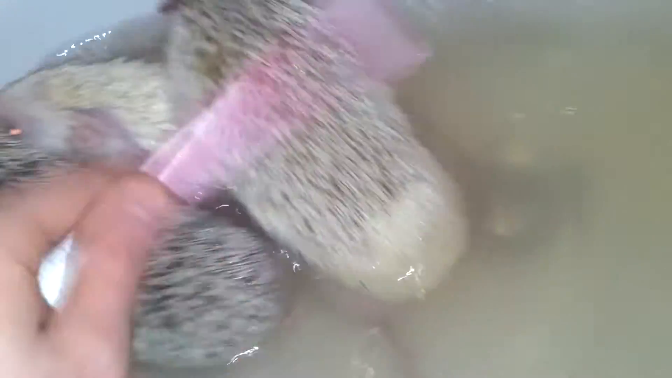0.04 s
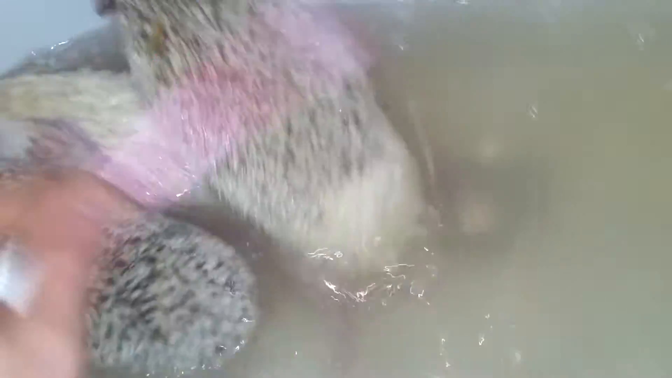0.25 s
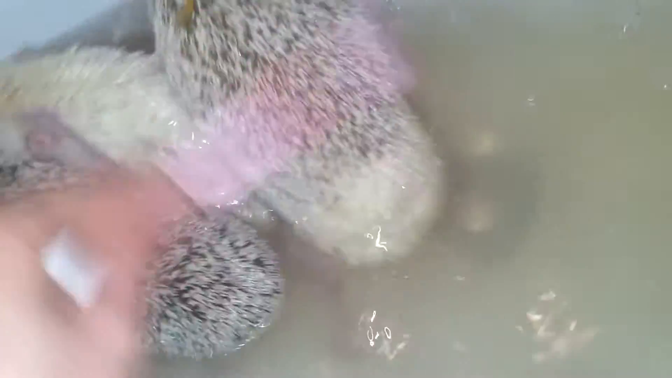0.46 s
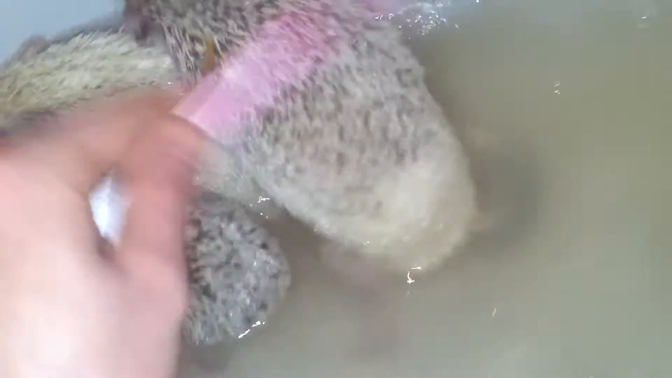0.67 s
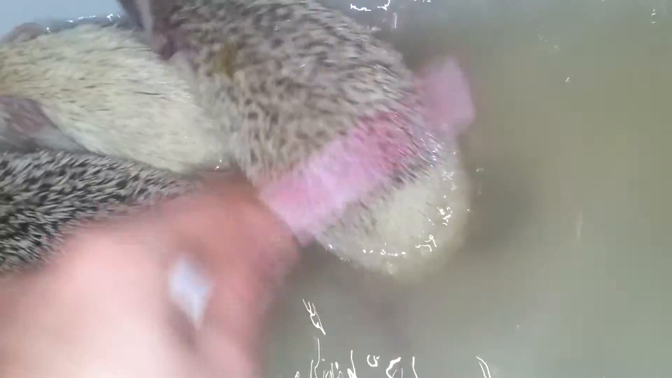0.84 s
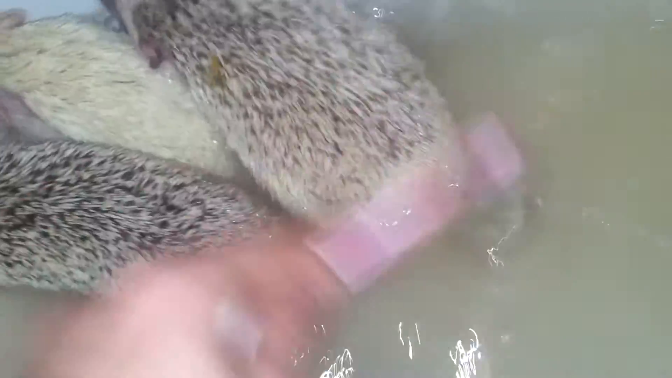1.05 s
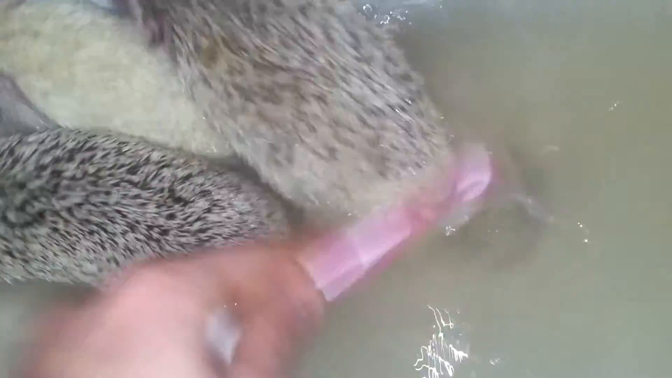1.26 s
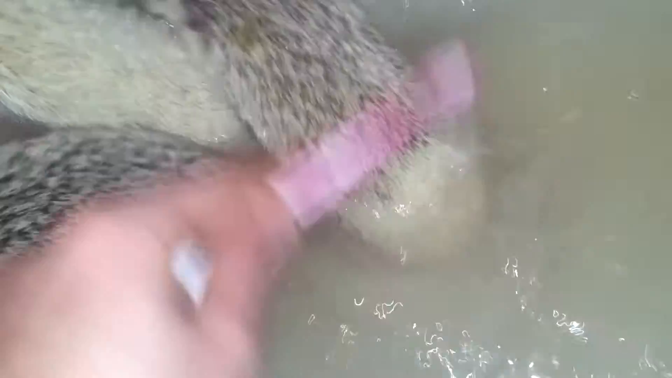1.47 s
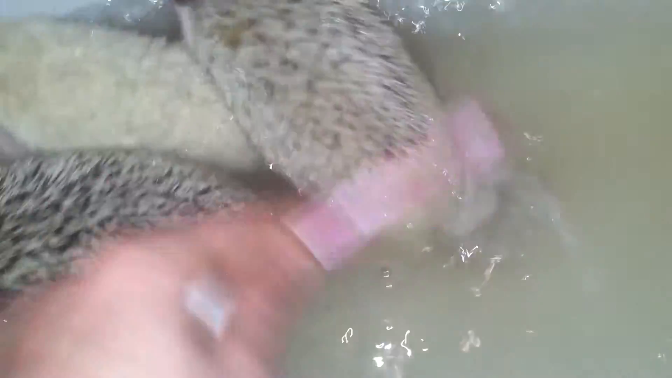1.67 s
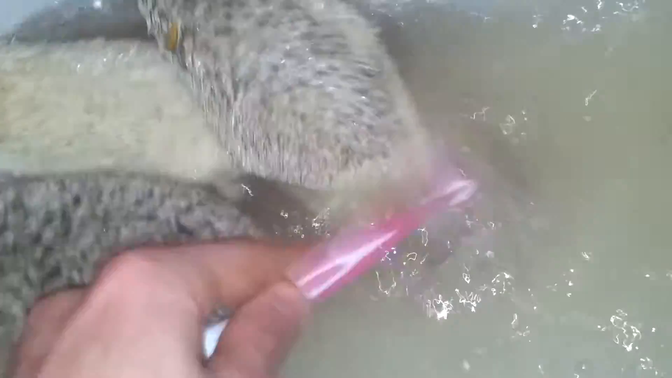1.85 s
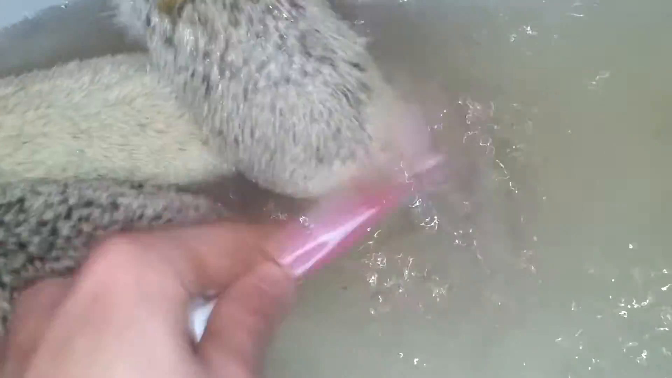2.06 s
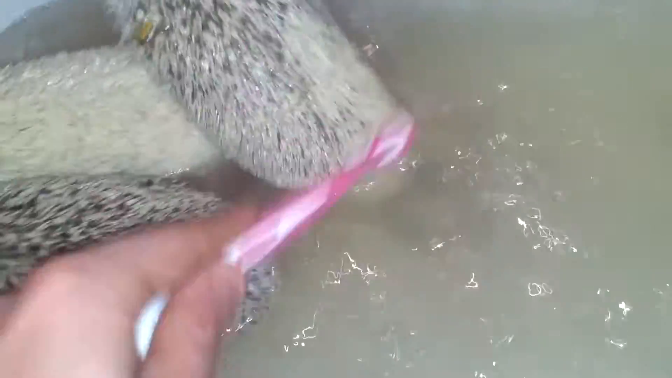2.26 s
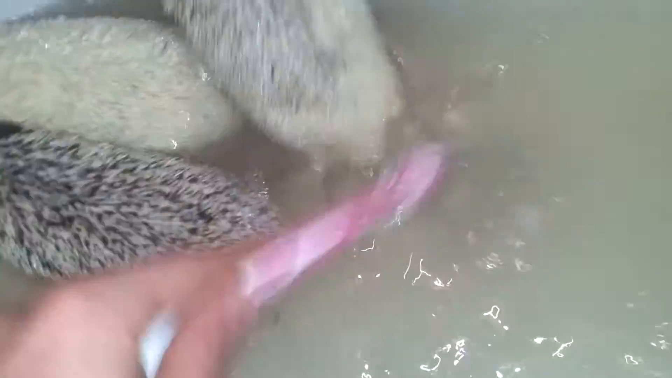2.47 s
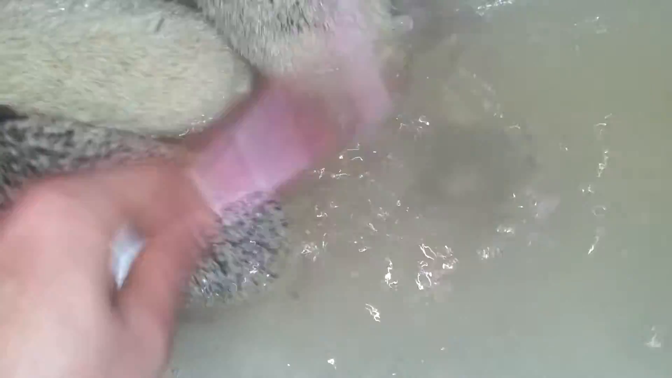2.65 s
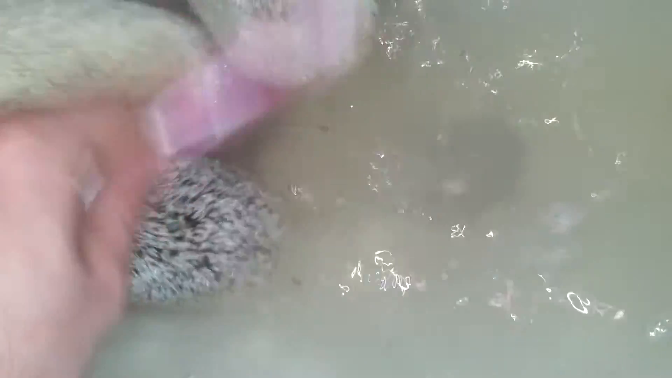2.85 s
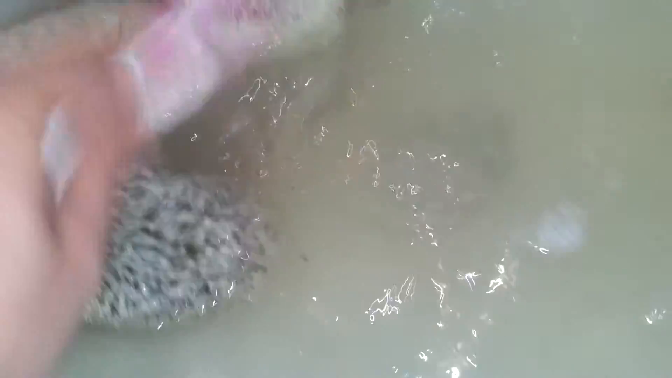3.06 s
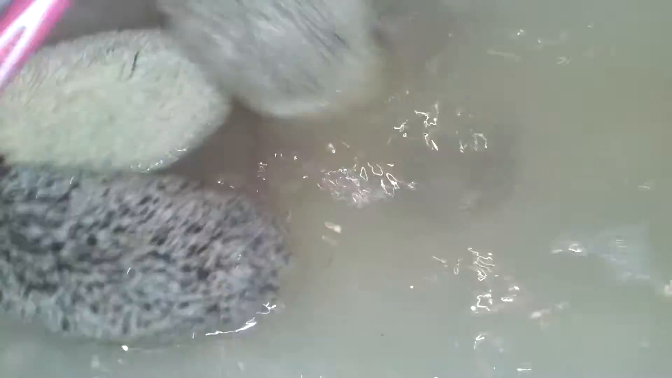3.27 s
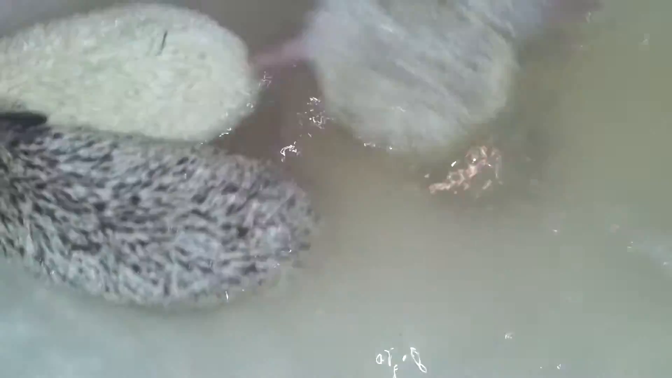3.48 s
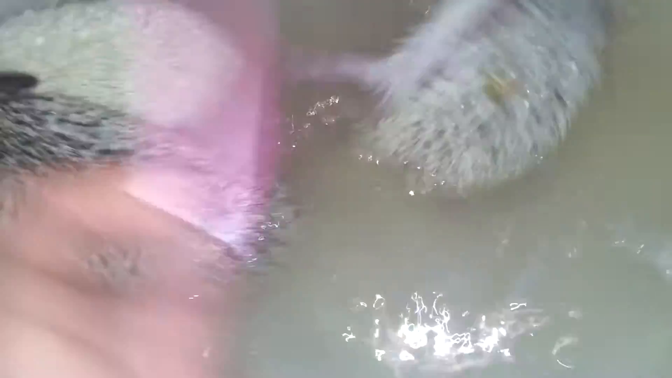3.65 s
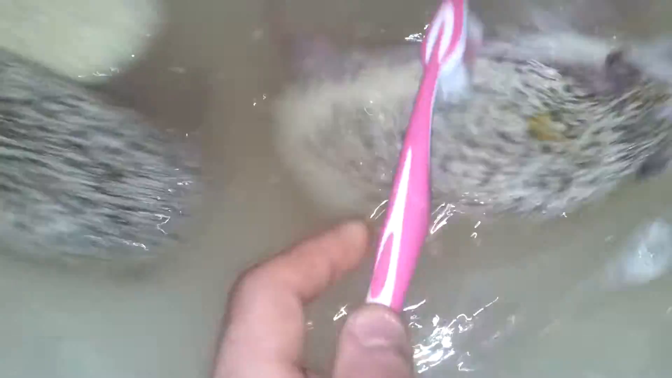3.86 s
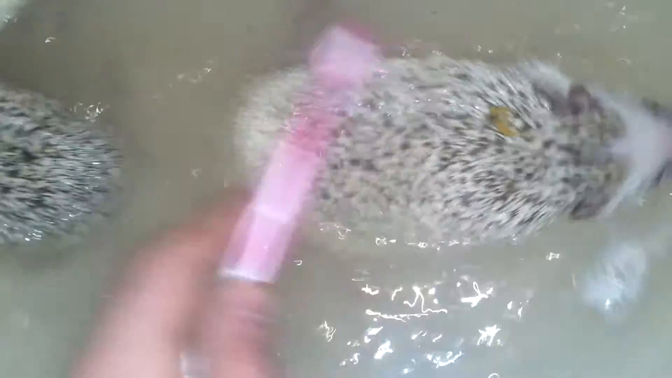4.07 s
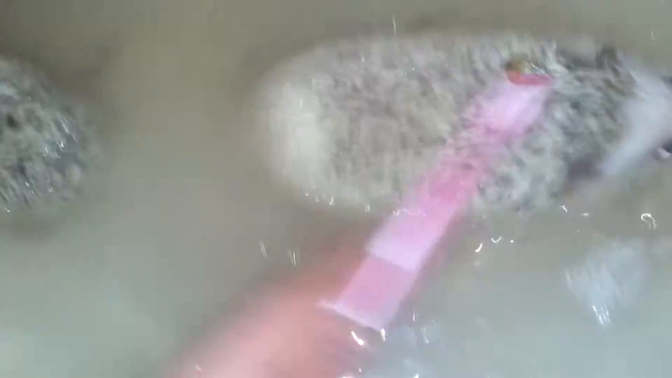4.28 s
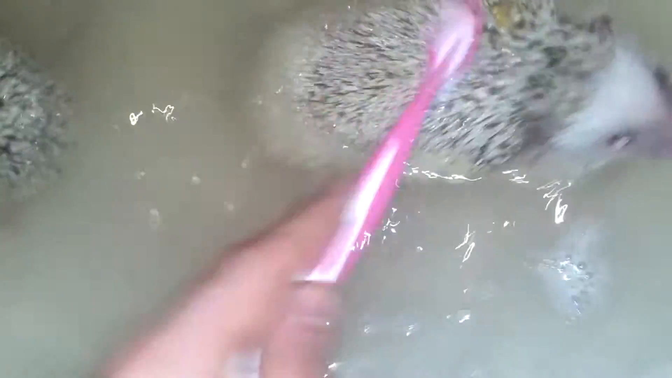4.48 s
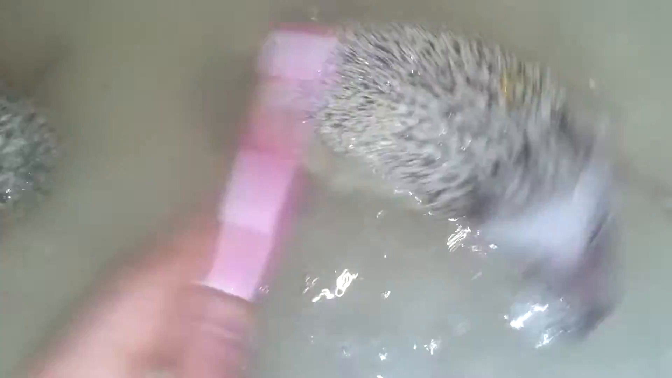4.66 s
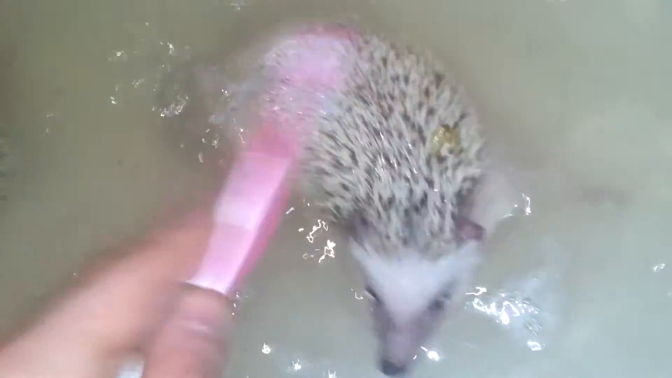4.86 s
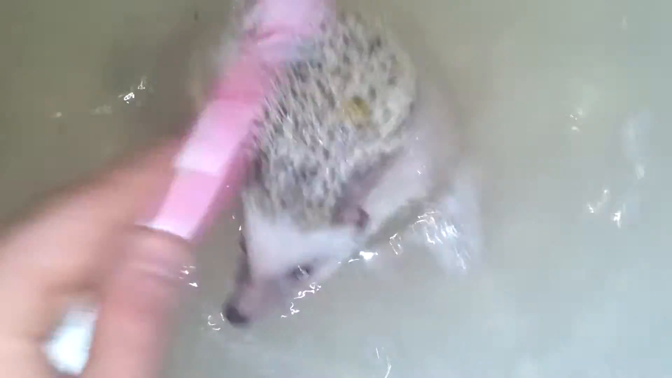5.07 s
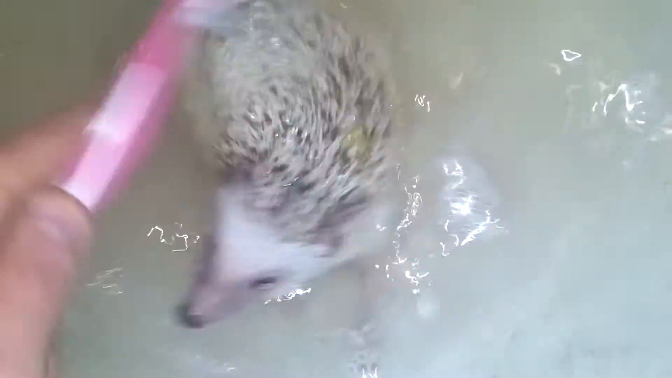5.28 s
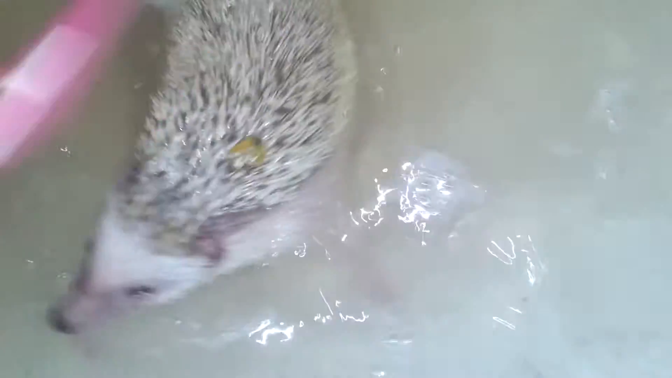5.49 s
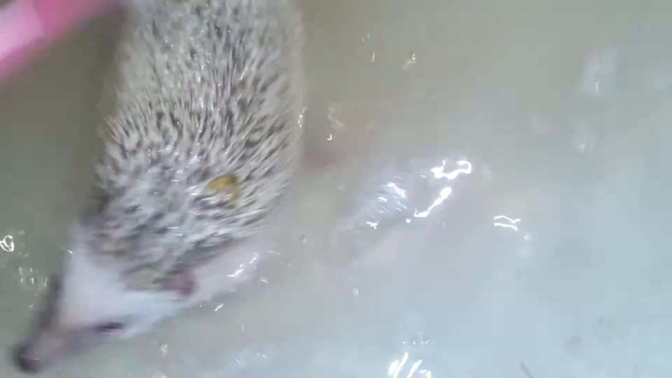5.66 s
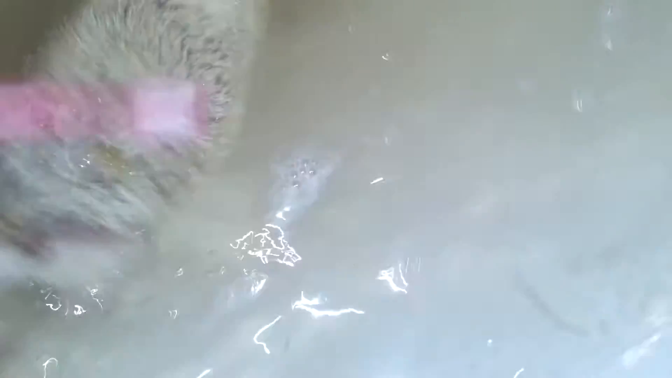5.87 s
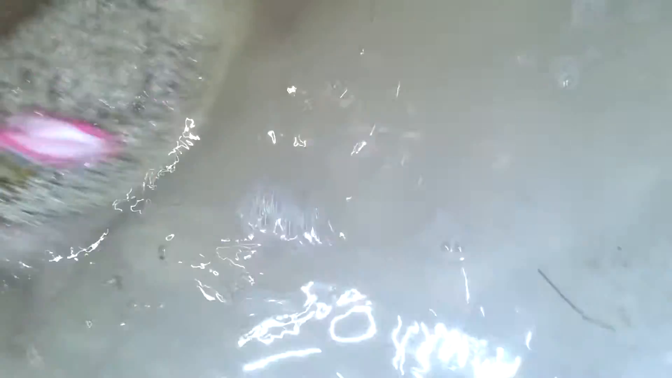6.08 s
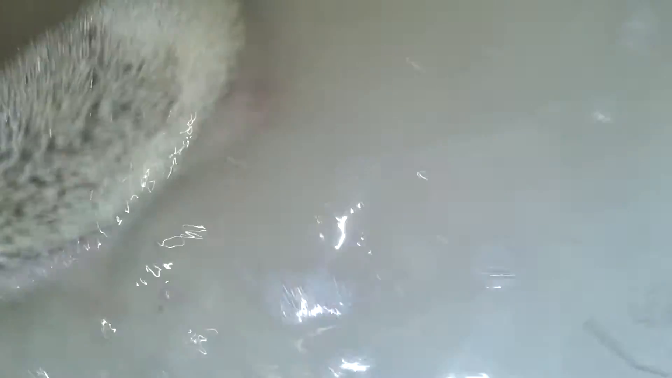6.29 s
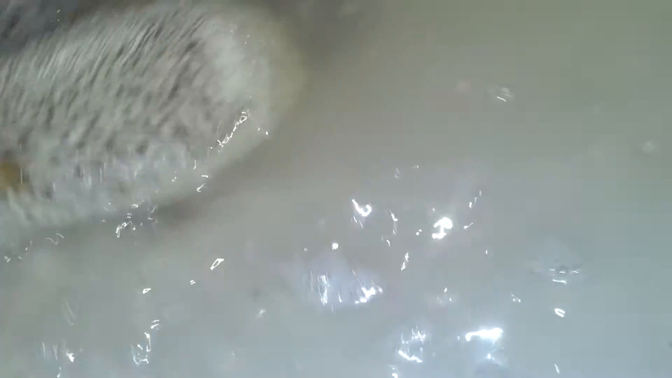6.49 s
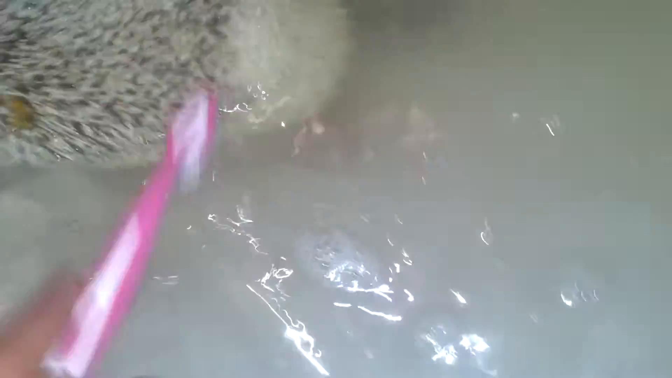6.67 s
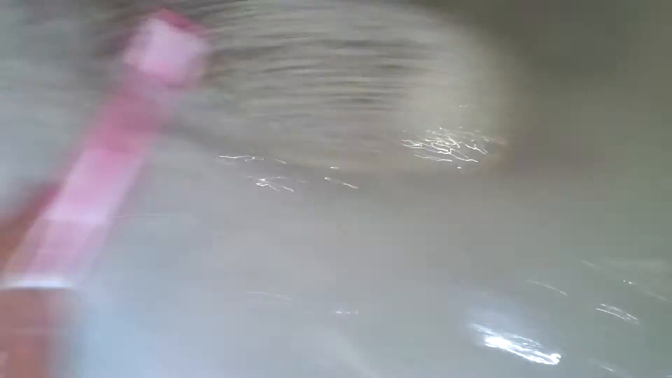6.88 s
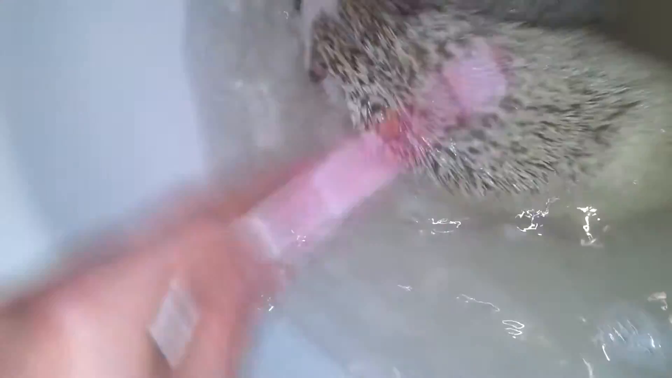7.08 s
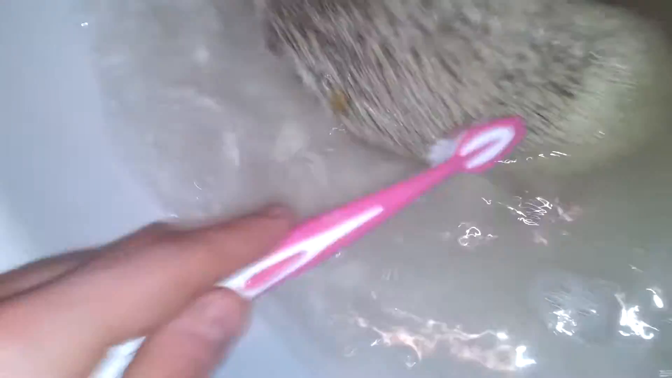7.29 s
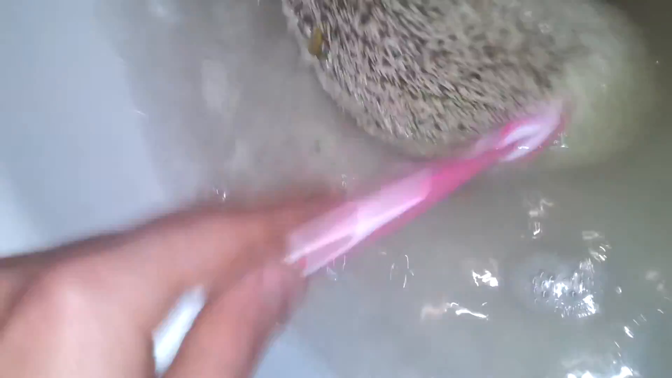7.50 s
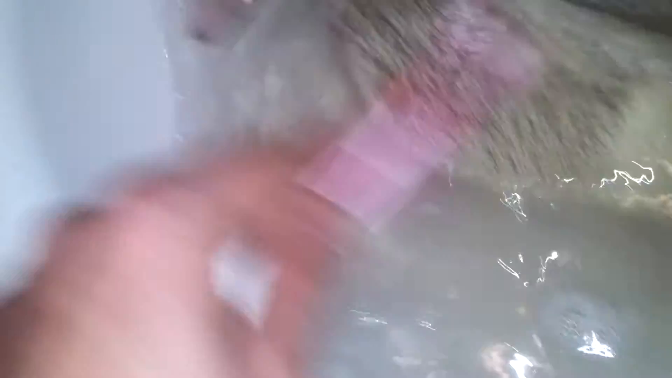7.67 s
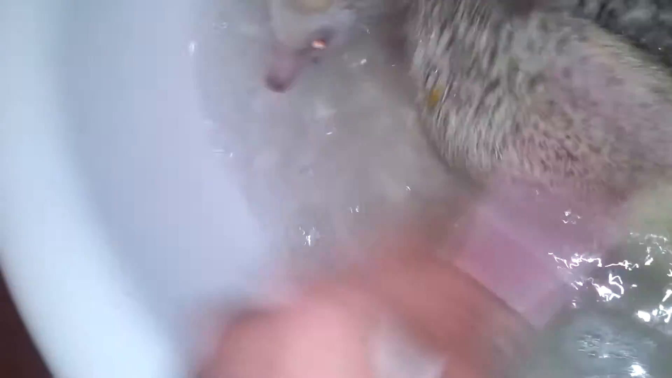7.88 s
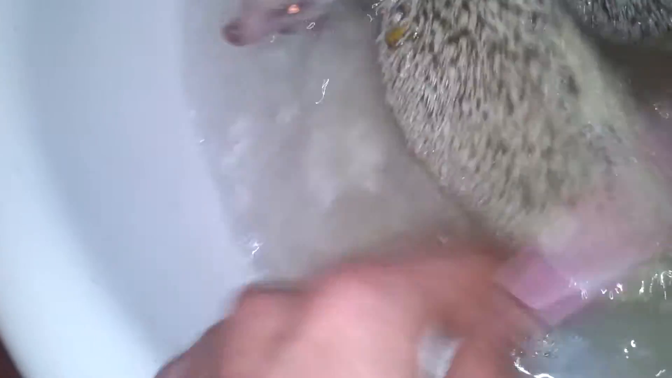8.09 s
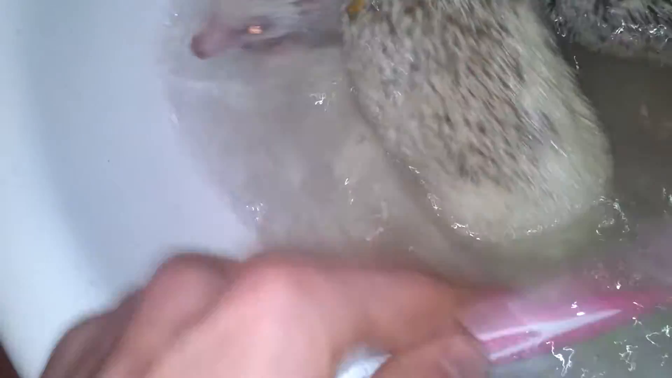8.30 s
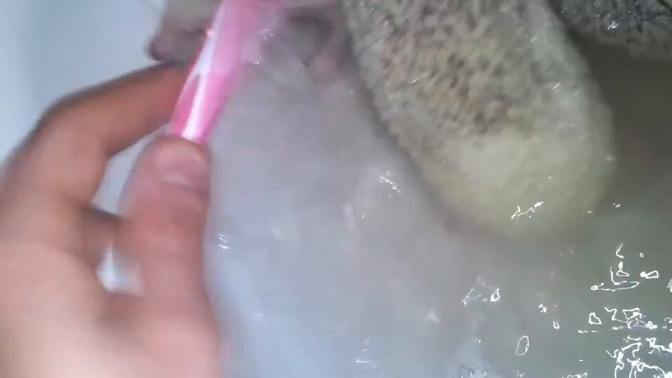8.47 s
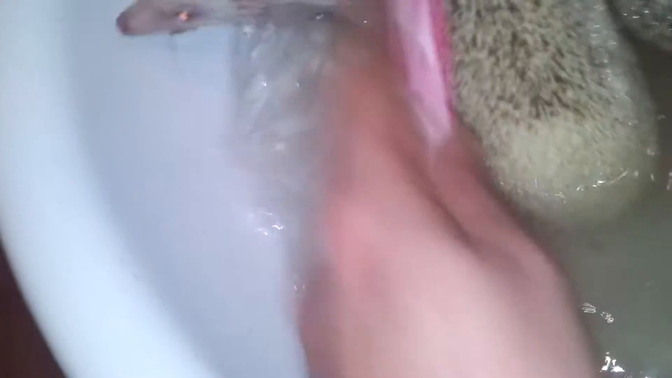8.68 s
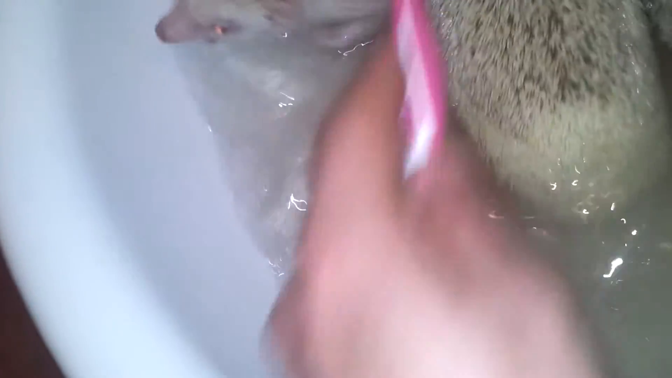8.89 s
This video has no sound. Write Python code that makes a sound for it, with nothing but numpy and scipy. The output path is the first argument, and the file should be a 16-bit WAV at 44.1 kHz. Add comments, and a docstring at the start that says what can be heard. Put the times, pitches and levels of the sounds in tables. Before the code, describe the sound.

Toothbrush bristles scrub a small spiny animal in a tub of water, brisk fizzing strokes with pauses, drips, plops and light swishes.

```python
"""Scrubbing a hedgehog in a tub

A toothbrush scrubs the wet spines of a small hedgehog in a plastic tub of shallow water, about five strokes
a second at its busiest. Each stroke is a dense fizz of tiny clicks that lands, swells and lifts off.
The animal paddles: filtered noise and ringing bubbles make the swishes, drips, plops and a low glug.
Bright noise bursts make the snaps and one soft touch of the brush, and random reflections make a small
hard room. The left port is shaded.
"""
import sys
import numpy as np
from scipy import signal
from scipy.fft import rfft, irfft
from scipy.io import wavfile

SR = 44100
rng = np.random.default_rng(int(sys.argv[2]) if len(sys.argv) > 2 else 0)


def store_wav(level_fs):
    """Save 16-bit WAV to argv[1]."""
    pcm = np.round(np.clip(np.atleast_2d(level_fs), -1, 1) * 32767)
    wavfile.write(sys.argv[1], SR, pcm.T.astype(np.int16))


N = 394254
TIME = np.arange(N) / SR  # seconds
BINS = np.fft.rfftfreq(N, 1 / SR)  # Hz

# Steady background at each port: frequency_hz, left_db_per_hz, right_db_per_hz
BACKGROUND_SPECTRA = [(20, -98, -104), (44.3, -86.5, -91), (84, -78.5, -103.5), (119, -78, -89.5),
                      (239, -84, -86.5), (460, -89, -88), (1020, -94.5, -94), (2240, -99, -100),
                      (4500, -101, -100), (6200, -107, -101), (7200, -105, -96.5), (9200, -104, -101),
                      (15000, -103, -102)]
# How long the room rings (t60 = time to fall by 60 dB): frequency_hz, t60_s
ROOM_RING = [(200, 0.4), (1000, 0.32), (4000, 0.29), (8000, 0.26), (15000, 0.28)]
# How well the walls reflect: frequency_hz, gain_db
WALL_REFLECTION = [(300, 1), (1500, 3.5), (4000, 1), (7500, 0), (10000, -0.5), (14500, -2.5)]
# What the shaded left port loses: frequency_hz, gain_db
LEFT_SHADE = [(200, -4.5), (450, -4), (750, -14.5), (1300, -14.5), (2200, -17.5), (4000, -22.5),
              (6000, -29), (8000, -30.5), (12000, -17.5), (15000, -23)]
# What the straight path round to the left port loses as well: frequency_hz, gain_db
PATH_AROUND = [(500, -2.5), (1200, -4.5), (3000, -7), (8000, -12)]
# Colour of swishing water: frequency_hz, relative_db
SWISH_COLOUR = [(120, -22.5), (300, 0), (550, 0), (1000, 0.5), (2000, 5.5), (3500, 4.5), (7500, 6),
                (10000, 3), (15000, -5.5)]
# How restless the water is in the tub: time_s, level_db
WATER_UNREST = [(0, -53), (.85, -52), (1.15, -60.5), (1.75, -52), (2.2, -58.5), (3.2, -57.5), (3.35, -86),
                (3.75, -58), (5.5, -67), (6.4, -54), (7.6, -65), (8.94, -67)]
# Water sloshes; the row at 0 s is the end of a brush stroke already lifting off:
# crest_s, level_db, half_length_s
WATER_SWELLS = [(0, -44, 0.026), (0.987, -42, 0.041), (1.424, -43, 0.11), (3.897, -54.5, 0.077),
                (6.446, -45, 0.063), (6.6, -53.5, 0.11), (7.003, -46, 0.15), (8.445, -52.5, 0.11),
                (8.578, -50, 0.073)]
# A drip traps a bubble that rings: start_s, level_db, pitch_hz
DRIP_EVENTS = [(.117, -28, 3350), (.940, -34.5, 2920), (1.3226, -21.5, 1860), (1.389, -30, 2480),
               (1.430, -30.5, 496), (1.480, -30.5, 342), (1.482, -27.5, 930), (1.542, -24, 4400),
               (1.692, -28.5, 1375), (2.222, -30.5, 2020), (3.585, -36, 1450), (3.879, -34.5, 1900),
               (3.912, -40, 1690), (3.974, -30, 2300), (4.811, -32.5, 2400), (4.963, -34, 1860),
               (6.649, -27, 4230), (7.2932, -23, 3170), (7.355, -31.5, 3800), (7.367, -27.5, 1750),
               (8.287, -29.5, 2270)]
# A heavy drop plops: start_s, level_db, pitch_hz, tilt_db_per_octave (away from the pitch, either way)
PLOP_EVENTS = [(0.0552, -14.5, 2420, -17), (6.2734, -13, 761, 2), (6.720, -19, 1132, -11)]
# What a plop rings with: multiple_of_pitch, level_db, t60_s
PLOP_PARTIALS = [(.58, -16.5, 0.024), (1, -10.5, 0.076), (1.05, -2.5, 0.027), (1.3, -11.5, 0.028),
                 (1.7, -3.5, 0.016), (2.95, -8, 0.0058)]
# A spine or water film snaps; at 6.161 s the brush touches softly:
# start_s, peak_db, pitch_hz, width_octaves
SNAP_AND_TOUCH_EVENTS = [(0.054, -13.5, 8300, 0.095), (0.122, -33, 4480, 0.19), (1.323, -26, 7500, 0.52),
                         (2.0820, -12, 7700, .3), (2.540, -25.5, 7400, 0.075), (2.800, -32, 7200, .27),
                         (2.938, -19.5, 4720, 0.13), (3.1183, -9, 13600, 0.16), (3.912, -27, 7300, .33),
                         (3.949, -32, 7500, .36), (4.46, -34.5, 9000, 0.69), (4.838, -26, 7000, 0.87),
                         (4.909, -33, 13000, 0.47), (5.43, -16, 8350, 0.22), (5.944, -22.5, 8500, 0.54),
                         (6.161, -26, 7700, 1), (6.2732, -6.5, 8630, 0.43), (6.429, -23, 7300, 0.11),
                         (6.581, -31, 8140, .37), (6.647, -31, 4260, 0.31), (7.043, -25, 7000, 1),
                         (7.2917, -20.5, 3560, 0.4), (8.559, -28.5, 5750, 0.44), (8.716, -18, 7560, .44)]
# Colour of bristles on spines: frequency_hz, relative_db
BRISTLE_COLOUR = [(300, -33.5), (900, -24.5), (1250, -12.5), (2200, -12), (3300, -6), (5000, -3),
                  (6200, -2.5), (7800, 1.5), (10000, -4.5), (12500, -6.5), (15000, -11.5)]
# Brush strokes: start_s, touch_to_fastest_s, relative_level_db, landing_db (relative to that level),
# pressure_db (rasp over fizz)
BRUSH_STROKES = [(0.148, 0.023, -30, -3, -4), (0.326, 0.077, -27.7, -21, -1.5),
                 (.550, 0.069, -28, -9.5, -2), (0.778, 0.044, -28, -2, -1), (0.978, 0.056, -30, 0, 0),
                 (1.199, 0.049, -26.5, -5.5, -2), (1.411, .047, -28, -28, -2), (1.630, 0.026, -28.5, 3, 1),
                 (1.816, .056, -26, -25, -0.5), (2.017, 0.07, -24.5, -10, -1),
                 (2.242, 0.036, -27, -3.5, -5.5), (2.440, 0.047, -26.5, -2.5, -4.5),
                 (2.641, 0.041, -33.5, -8, -4.5), (2.844, 0.049, -26, -5, -3),
                 (3.051, 0.059, -29, -3.5, -3), (4.025, 0.069, -44, -0.5, -1.5),
                 (4.304, 0.069, -34.5, 0, -3), (4.533, 0.048, -32.5, -2.5, -1.5),
                 (4.749, 0.054, -31, -17, -3.5), (4.959, 0.091, -37, 2, -1.5), (5.164, .076, -31.5, -3, -1),
                 (5.387, 0.039, -35.5, 2.5, 1.5), (5.567, 0.064, -35.5, -2, -1.5),
                 (5.872, 0.051, -32, -16, -1.5), (6.182, 0.03, -37, 0, 2), (6.900, 0.038, -44.5, -3, -1),
                 (7.000, 0.046, -42, -2, 2), (7.222, 0.065, -37, -8, -1), (7.472, 0.032, -34, 1, 1),
                 (7.688, 0.043, -36, -4.5, 0.5), (7.875, .053, -32.4, -25, 1), (8.077, 0.037, -34, -25, 1),
                 (8.282, 0.038, -32, -1, -1), (8.712, 0.072, -35, 1.5, -4)]

EDGE_HZ = 14720  # upper limit of the recorder
SHADE_LAG_S = 0.00024
RING_S, RING_AT_HZ, RING_SLOPE = 0.02, 2000, 0.31  # t60 of a bubble at that pitch; smaller ones die sooner
GLUG_S, GLUG_LENGTH_S, GLUG_HZ, GLUG_DB = 3.668, 0.084, 258, -50.5
FLICKS_PER_S, RASP_HZ = 22000, 5000  # rasp lies mostly below this pitch, fizz above
ECHO_S, ECHO_SHARE = 0.0016, 0.27  # the water surface and tub wall return each stroke a moment later
STROKE_S = 0.14  # all strokes take about this long: the later the fastest point, the quicker the lift-off
SWELL_SHARE, FADE_SHARE = 0.58, 0.23  # widths as shares of the time before and after the fastest point


def gain_of(db):
    """Turns decibels into a multiplier."""
    return 10 ** (np.asarray(db) / 20)


def evened(x):
    """Scales a sound to an average (rms) level of 1."""
    return x / np.sqrt(np.mean(x ** 2) + 1e-20)


def read(points, hz):
    """Reads a table between its points, along a logarithmic pitch scale."""
    f, value = np.transpose(points)
    return np.interp(np.log(hz + 1), np.log(f + 1), value)


def add(mix, s, sound):
    """Adds a sound to the mix at a time in seconds."""
    part = mix[max(round(s * SR), 0):][:len(sound)]
    part += sound[:len(part)]


def coloured(x, points):
    """Makes each pitch louder or softer as a table says."""
    return irfft(rfft(x) * gain_of(read(points, BINS)), N)


def wander(max_hz):
    """Slow random movement: noise kept below max_hz, at rms 1."""
    return evened(irfft(rfft(rng.standard_normal(N)) * (BINS < max_hz), N))


def grains(per_s, spread_db):
    """Tiny clicks at random moments, of random sign and size, at rms 1."""
    size = rng.standard_normal(N) * gain_of(spread_db * np.minimum(rng.exponential(1, N), 4))
    return evened(size * (rng.random(N) < per_s / SR))


def crackle(pitch, octaves, rise_s):
    """A noise burst around one pitch that rises and dies in milliseconds; peak 1."""
    t = np.arange(SR // 8) / SR
    hz = np.fft.rfftfreq(len(t), 1 / SR)
    octaves_away = np.log2((hz + 1) / pitch)
    band = np.exp(-0.5 * (octaves_away / octaves) ** 2)
    noise = irfft(rfft(rng.standard_normal(len(t))) * band, len(t))
    burst = noise * t * np.exp(-t / rise_s)
    return burst / abs(burst).max()


def bubble(hz, t60, rise_per_s=1.0, onset_s=0.00071, splash_db=-9.5, splash_octaves=0.66, splash_s=0.002):
    """The surface breaks with a tiny splash; the bubble rings and goes sharp as it rises."""
    t = np.arange(SR // 8) / SR
    tone = np.sin(2 * np.pi * hz * t * (1 + rise_per_s * t))  # pitch climbs by twice rise_per_s
    ring = tone * (1 - np.exp(-t / onset_s)) * np.exp(-np.log(1000) * t / t60)
    return ring + gain_of(splash_db) * crackle(hz, splash_octaves, splash_s)


def background(port):
    """Room rumble and faint hiss: steady noise coloured for one port (0 left, 1 right)."""
    spectrum = np.array(BACKGROUND_SPECTRA)[:, [0, port + 1]]
    return np.sqrt(SR / 2) * coloured(rng.standard_normal(N), spectrum)


def tail(first_s=0.003):
    """Dense reflections of random sign, each band dying at its own speed."""
    count = SR // 2
    taps = rng.choice([-1.0, 1.0], count)
    taps = taps * (rng.random(count) < 3000 / SR)  # about 3000 reflections a second
    taps = taps * (TIME[:count] > first_s)
    hz, t, bands = signal.stft(taps, SR, nperseg=256)
    decay = np.exp(-np.log(1000) * t / read(ROOM_RING, hz)[:, None])
    ring = signal.istft(bands * decay, SR, nperseg=256)[1]
    return ring / np.linalg.norm(ring)


def room(x, drift_per_s=0.599, count=3):
    """The pattern of reflections drifts, as hand and animal move, by fading between several tails."""
    out = np.zeros(N)
    for k in range(count):
        share = np.cos(np.pi * (drift_per_s * TIME + k / count)) * np.sqrt(2 / count)
        out += signal.oaconvolve(x * share, tail())[:N]
    return out


def stirring():
    """Loudness of the moving water: each swell in the table comes and goes over the general unrest."""
    power = gain_of(np.interp(TIME, *np.transpose(WATER_UNREST))) ** 2
    for crest_s, db, half_s in WATER_SWELLS:
        power = power + gain_of(db) ** 2 * np.exp(-2 * ((TIME - crest_s) / half_s) ** 2)
    return np.sqrt(power)


def water(swish_db=-0.5, bubbles_db=-11, bubbles_per_s=500, lap_db=3.0):
    """Stirred water swishes as coloured grains and sheds a froth of small ringing bubbles."""
    swish = evened(coloured(grains(per_s=6000, spread_db=1.0), SWISH_COLOUR))
    swish = swish * gain_of(lap_db * wander(max_hz=20))
    t = np.arange(SR // 20) / SR
    froth = np.zeros(N)
    pitches = np.geomspace(500, 6000, num=24)
    for hz in pitches:
        ring = np.sin(2 * np.pi * hz * t * (1 + 3 * t)) * np.exp(-t * hz / 4)
        starts = grains(bubbles_per_s / len(pitches), spread_db=6.0)
        froth += signal.oaconvolve(starts, ring * (hz / pitches[0]) ** 0.7)[:N]
    return stirring() * (gain_of(swish_db) * swish + gain_of(bubbles_db) * evened(froth))


def glug():
    """A short, wobbling low note as a body shifts in the water."""
    out = np.zeros(N)
    count = round(GLUG_LENGTH_S * SR)
    pitch = GLUG_HZ * (1 + 0.036 * wander(max_hz=42)[:count])
    turns = np.cumsum(pitch) / SR
    note = evened(np.sin(2 * np.pi * turns)) * signal.windows.tukey(count, 0.3)
    add(out, GLUG_S, gain_of(GLUG_DB) * note)
    return out


def drips(low_hz=340):
    """A drip rings one bubble; a heavy drop opens a cavity that rings with several partials."""
    out = np.zeros(N)
    for s, db, hz in DRIP_EVENTS:
        t60 = RING_S * (RING_AT_HZ / hz) ** RING_SLOPE
        add(out, s, gain_of(db) * bubble(hz, t60))
    for s, db, hz, tilt_db in PLOP_EVENTS:
        for multiple, partial_db, t60 in PLOP_PARTIALS:
            level_db = db + partial_db + tilt_db * abs(np.log2(multiple))
            add(out, s, gain_of(level_db) * bubble(hz * multiple, t60))
    bass_cut = signal.butter(2, low_hz, "highpass", fs=SR, output="sos")
    return signal.sosfilt(bass_cut, out)  # keeps the drips and plops free of low thump


def snaps_and_touch(rise_s=0.0007):
    """Snaps of a spine or water film, and one soft brush touch: a millisecond or two of bright crackle."""
    out = np.zeros(N)
    for s, db, pitch, octaves in SNAP_AND_TOUCH_EVENTS:
        add(out, s, gain_of(db) * crackle(pitch, octaves, rise_s))
    return out


def scrub(level_db=0.94, landing_s=0.014, touch_s=0.0035, bend_s=0.0086, fizz_db=2.5, catch_db=1.37, count=3):
    """Bristles flick over spines, louder with brush speed; pressure brings rasp, speed brings fizz."""
    flicks = evened(coloured(grains(FLICKS_PER_S, spread_db=0.5), BRISTLE_COLOUR))
    flicks = flicks * gain_of(catch_db * wander(max_hz=110))  # tufts catch and let go
    rasp = irfft(rfft(flicks) / (1 + (BINS / RASP_HZ) ** 4), N)
    fizz = flicks - rasp
    t = np.arange(SR // 5) / SR
    out = np.zeros(N)
    places = rng.uniform(-1, 1, (len(BRUSH_STROKES), count))
    for (s, fastest, sweep_db, landing_db, pressure_db), place in zip(BRUSH_STROKES, places):
        landing = gain_of(landing_db) * np.exp(-t / landing_s) * np.minimum(t / touch_s, 1)
        width = np.where(t < fastest, SWELL_SHARE * fastest, FADE_SHARE * (STROKE_S - fastest))
        sweep = np.exp(-abs((t - fastest) / width) ** 1.31)
        sweep = sweep * np.minimum(t / bend_s, 1)  # bristles bend before they slide
        speed = gain_of(sweep_db) * np.hypot(landing, sweep)
        rasp_db = pressure_db - fizz_db * (sweep - 0.7)
        span = round(s * SR) + np.arange(len(t))
        low = speed * rasp[span] * gain_of(rasp_db / 2)
        high = speed * fizz[span] / gain_of(rasp_db / 2)
        add(out, s, low + high)
        for path in place:  # the animal moves, so every stroke has its own hollow colour
            add(out, s + ECHO_S * 2 ** path, ECHO_SHARE * (low + 0.5 * high))
    return gain_of(level_db) * out


def scene(brush_room_db=-8, snap_room_db=-10, drip_room_db=-7.5, water_room_db=-5.0, left_room_db=6.0):
    """The right port faces the tub; the left hears it muffled, later and more through the room."""
    brush, ticks, drops, wet = scrub(), snaps_and_touch(), drips(), water()
    direct = brush + ticks + drops + wet + glug()
    sent = gain_of(brush_room_db) * brush + gain_of(snap_room_db) * ticks
    sent = sent + gain_of(drip_room_db) * drops + gain_of(water_room_db) * wet
    sent = coloured(sent, WALL_REFLECTION)
    late = np.interp(TIME - SHADE_LAG_S, TIME, direct)
    left = coloured(late, PATH_AROUND) + gain_of(left_room_db) * room(sent)
    left = coloured(left, LEFT_SHADE)
    right = direct + room(sent)
    return np.array([left + background(0), right + background(1)])


def record(dry):
    """The recorder's band limit: a filter removes the highest treble."""
    treble_cut = signal.firwin(401, EDGE_HZ, window=("kaiser", 8), fs=SR)
    return signal.oaconvolve(dry, treble_cut[None], "same")


dry = scene()
out = record(dry)
store_wav(out)
```